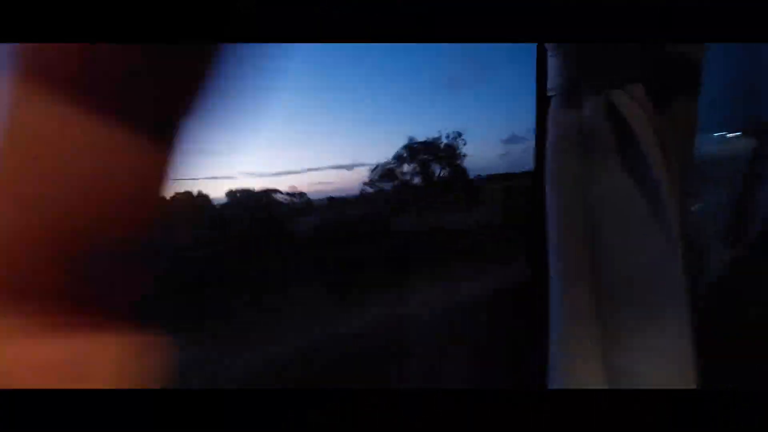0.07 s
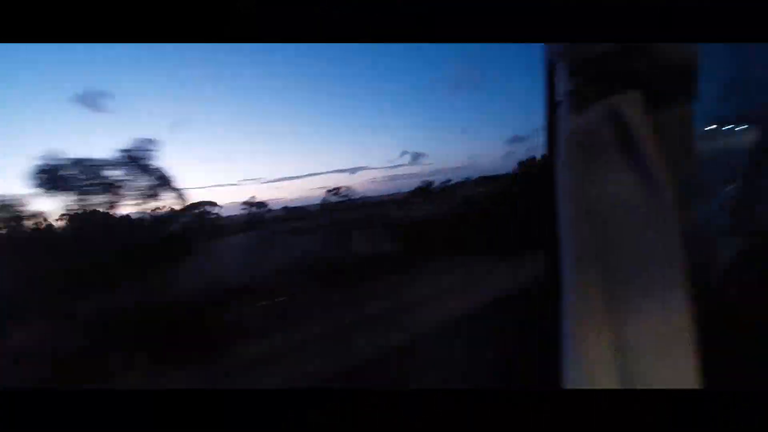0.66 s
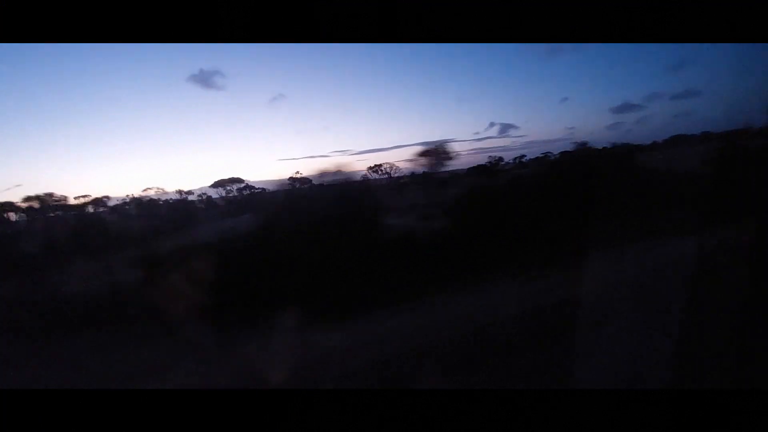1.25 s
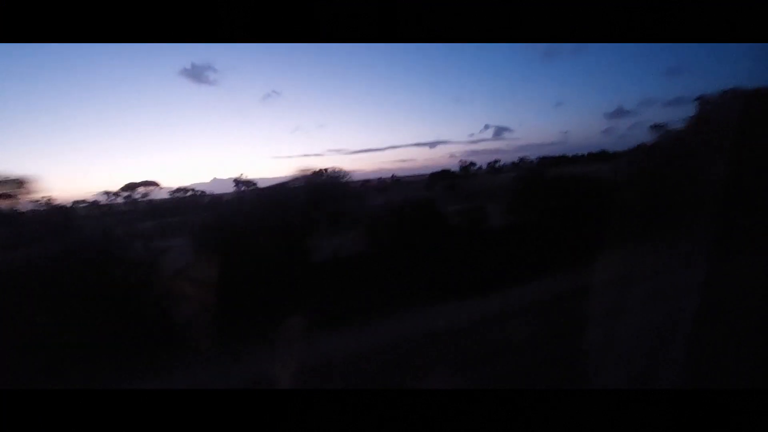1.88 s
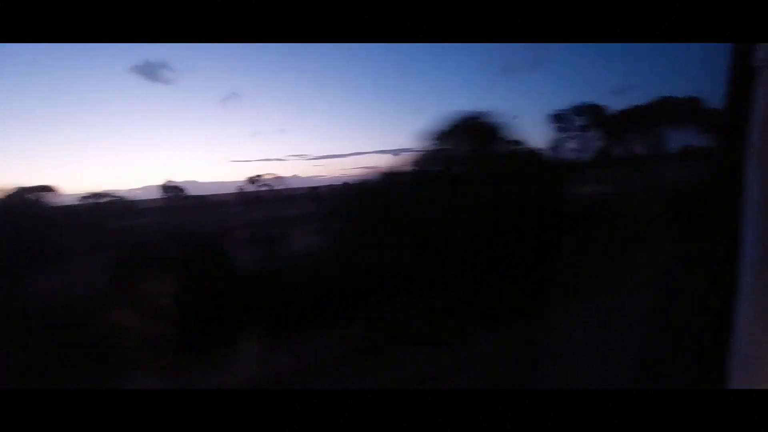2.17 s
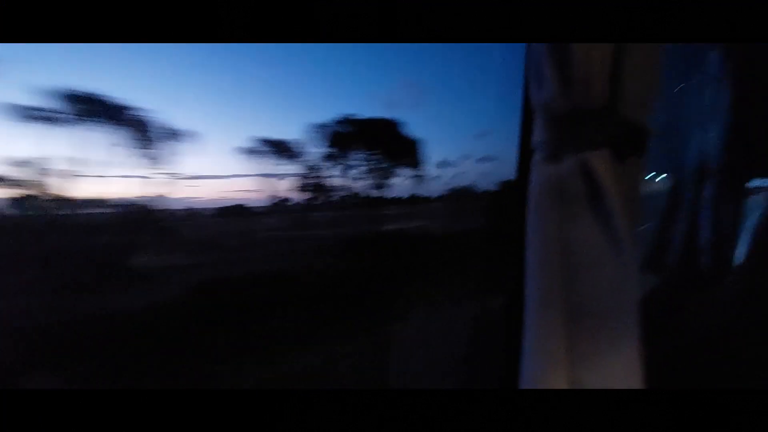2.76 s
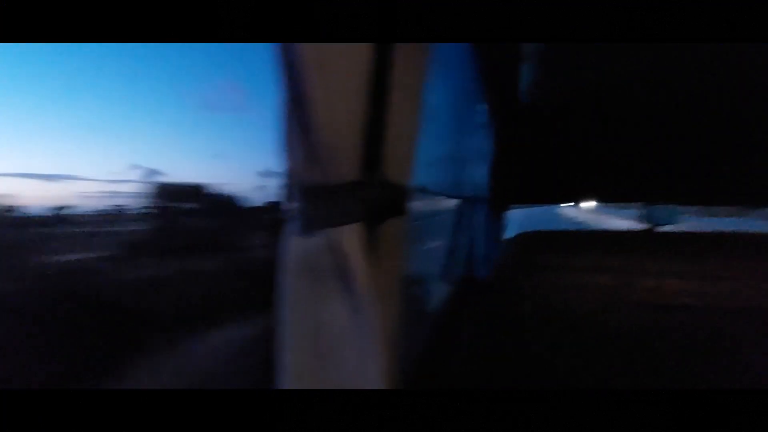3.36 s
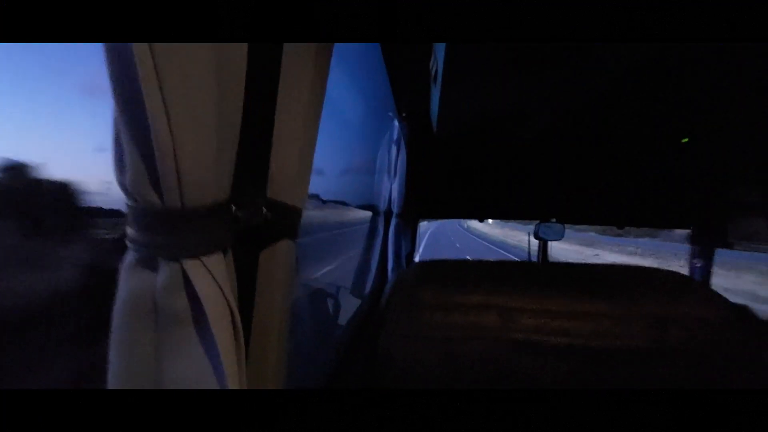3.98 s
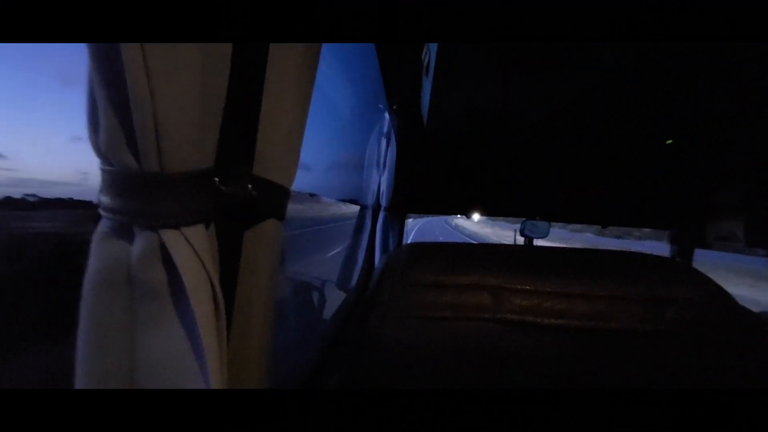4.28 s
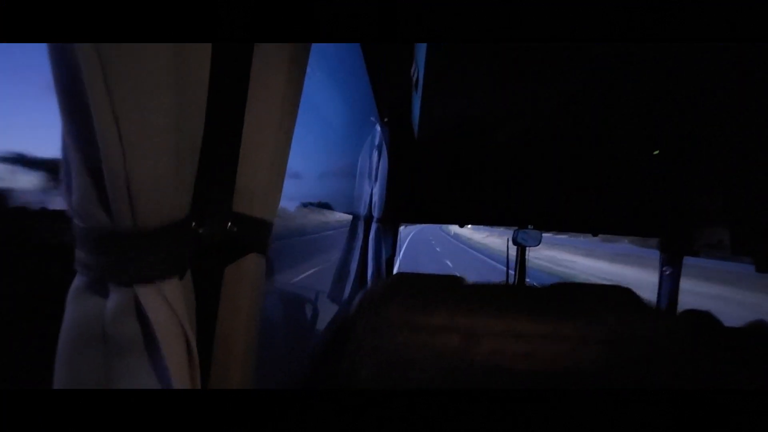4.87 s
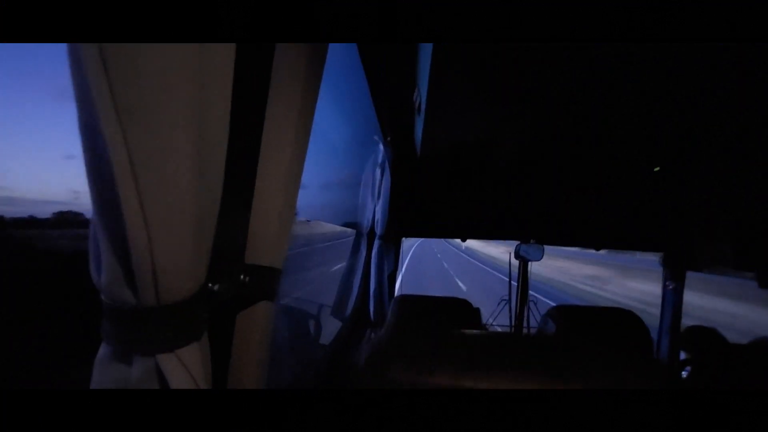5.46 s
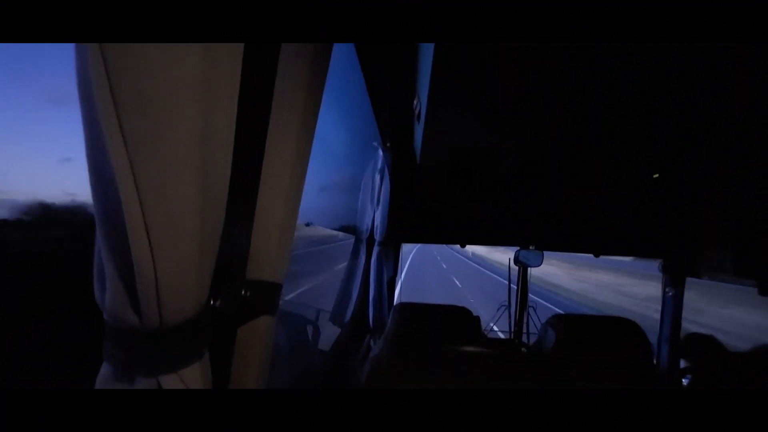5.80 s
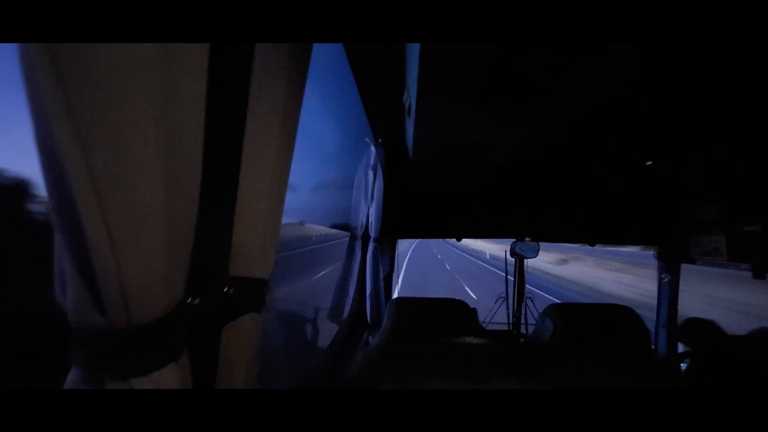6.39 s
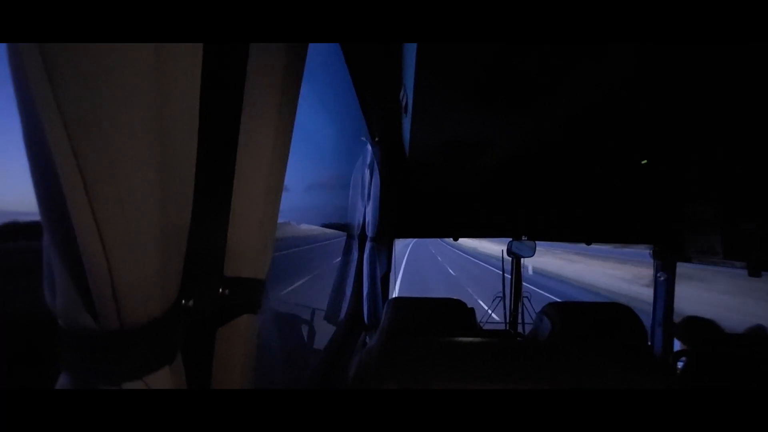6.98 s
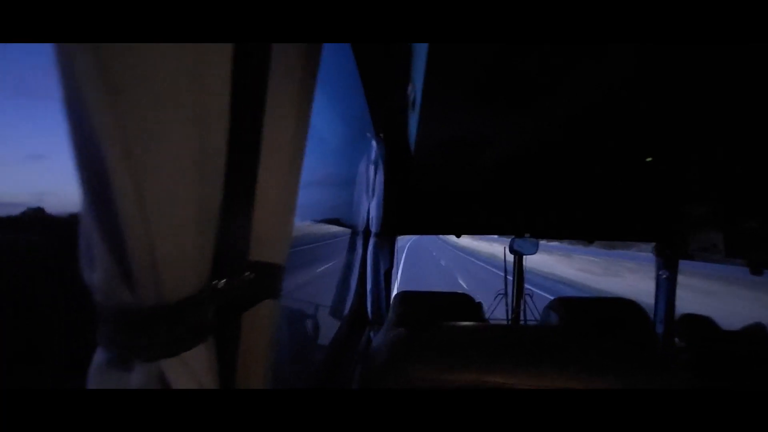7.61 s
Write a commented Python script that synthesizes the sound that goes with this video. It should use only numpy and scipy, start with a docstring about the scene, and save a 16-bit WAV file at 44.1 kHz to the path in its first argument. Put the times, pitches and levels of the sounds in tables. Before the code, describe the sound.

Inside a cruising coach, a deep road rumble and a steady diesel drone run throughout, with tyres and air rushing. At the start a fingertip knocks the hand-held microphone, and fingers scuff and tick on the right. Bumps jolt the body and knock a loose panel dully. A dry tap comes about halfway, trim squeaks faintly, and the tyre roar swells near the end.

```python
"""Inside a cruising coach, heard on a hand-held phone. All along, the road makes the body boom, a
six-cylinder diesel drones, and tyres and air rush. First a fingertip knocks the left microphone and fingers
scuff and tick by the right one. By 1 s the phone faces the side window and the right side has lost bass.
Bumps jolt the body and knock a loose panel. Around 3 s the phone turns back to the aisle and the body starts
to heave. A tap on the case follows at 4 s, trim squeaks after 5 s, and the tyres roar loudest near 7 s."""
import sys
import numpy as np
from scipy import signal
from scipy.fft import rfft, irfft
from scipy.io import wavfile

SR = 44100
rng = np.random.default_rng(int(sys.argv[2]) if len(sys.argv) > 2 else 0)


def file_out(sig):
    """Save sig as 16-bit WAV at sys.argv[1]."""
    # one column per channel
    cols = np.atleast_2d(sig).T
    # limit, then scale
    lim = np.clip(cols, -1, 1)
    pcm = np.round(lim * 32767).astype(np.int16)
    wavfile.write(sys.argv[1], SR, pcm)


N = 341334
TIME = np.arange(N) / SR
FREQ = np.arange(N // 2 + 1) * SR / N

# where the phone points: time_s, turn_share (0 = down the aisle, 1 = at the side window)
WINDOW_TURN = [(.5, 0), (1.0, 1), (2.65, 0.92), (3.6, 0.03)]


def body_boom(split_hz=200, boom_db=-2.0, sway_db=-0.93, drum_db=-8.5, window_db=2.5, flicker_db=-0.1):
    """The wheels shake the body into a deep boom and drum on the floor panels."""
    # how strong the boom is from low to high: pitch_hz, level_db_per_hz
    boom_shape = [(20, -74.5), (32, -67), (45, -51.5), (66, -43), (100, -47.5), (130, -41), (160, -48),
                  (185, -50.5), (260, -52.5), (370, -54), (520, -63), (800, -90.5), (2000, -115)]
    noise = cabin_noise() * undb(spectrum(boom_shape))
    noise *= FREQ ** 4 / (FREQ ** 4 + 10 ** 4)  # fades out below 10 Hz
    low_share = 1 / (1 + (FREQ / split_hz) ** 6)
    body = irfft(noise * low_share, N) * undb(boom_db + shaking() + sway_db * drift(5.7))
    floor = irfft(noise * (1 - low_share), N)
    floor *= undb(drum_db + window_db * curve(WINDOW_TURN) + flicker_db * drift(28))
    return body + floor


def engine(crank_hz=25.4, wander=0.001001, drone_db=-2.0, load_share=0.64):
    """The diesel and the parts it drives hum together, all following one slightly wandering speed."""
    # engine tones, on half steps because a four-stroke repeats every second turn:
    # crank_multiple, level_db, window_gain_db, right_gain_db
    engine_tones = [(1, -49.5, -1, 2.5), (1.5, -38, 2, 7), (2, -39.5, 7, -5.5), (3, -29.5, -0.5, 2.5),
                    (3.5, -35, 2, 1), (5, -42.5, 2.5, 5.5), (9, -47.5, 9.5, 3), (13, -45.5, -2.5, 2),
                    (14, -53.5, 10, -2), (22, -71, 9.5, -4), (23, -56, -9.5, 3.5)]
    # hums of the drive line and other engine-driven parts: pitch_hz, level_db
    drive_hums = [(58.2, -28), (212.3, -41.5)]
    # the cabin's hum at twice the rate the cylinders fire: time_s, level_db
    cabin_hum_levels = [(.05, -31.5), (.3, -24.5), (.85, -36), (1.8, -35), (2.1, -28.5), (2.6, -36),
                        (2.85, -29), (3.5, -30.5), (4.2, -28.5), (4.55, -26), (4.78, -28), (4.97, -24),
                        (5.18, -32), (5.42, -25), (5.63, -40), (5.85, -30), (6.45, -28.5), (6.75, -32.5),
                        (7.25, -29), (7.62, -25.5), (7.74, -29)]
    angle = wandering_angle(wander, 1.7)
    turn = curve(WINDOW_TURN)
    drone = sum(tone(multiple * crank_hz * angle, db + window_db * turn) * undb([[0], [right_db]])
                for multiple, db, window_db, right_db in engine_tones)
    drone += sum(tone(hz * angle, db) for hz, db in drive_hums)
    cabin_hum = tone(6 * crank_hz * angle, curve(cabin_hum_levels), waver_db=.7, slip_rad=.2)
    return drone * undb(drone_db + load_share * shaking()) + cabin_hum


def air_and_tyres(air_db=-1.9, flutter_db=0.7, split_hz=850,
                  roar_share=0.47, hiss_share=0.33, load_share=0.14):
    """Air hisses along the body and the tyres roar, more so on coarse asphalt and as the body heaves."""
    # the rush of air from low to high: pitch_hz, left_db_per_hz, right_db_per_hz
    air_shape = [(251, -79.5, -80.5), (560, -73, -69), (775, -71.5, -69.5), (1020, -79.5, -72),
                 (1620, -85.5, -78.5), (2410, -97, -79.5), (3140, -103, -88), (3660, -108, -87.5),
                 (4390, -110, -86), (5430, -116, -99.5), (6900, -120, -99), (8450, -126, -116),
                 (11800, -128, -115), (15500, -130, -125)]
    # how coarse the road is: time_s, gain_db
    road_surface = [(.4, -0.5), (1.25, -7), (2.2, -2.5), (2.85, 2), (3.3, -0.5), (3.9, 2.5), (5.45, 2.5),
                    (6.1, 1.5), (6.5, 4), (6.85, 8), (7.3, 2.5), (7.7, 1)]
    # echoes from window, seat back and roof: delay_s, gain
    reflections = [(.0031, .14), (.0074, .14), (.0127, .15)]
    # such short echoes boost some pitches and weaken others
    echo_filter = 1 + sum(gain * np.exp(-2j * np.pi * FREQ * delay) for delay, gain in reflections)
    air = cabin_noise() * echo_filter * undb([spectrum(air_shape, 1), spectrum(air_shape, 2)])
    coarse_db = curve(road_surface)
    low_share = 1 / (1 + (FREQ / split_hz) ** 6)
    roar = irfft(air * low_share, N) * undb(roar_share * coarse_db)
    hiss = irfft(air * (1 - low_share), N) * undb(hiss_share * coarse_db)
    rush = (roar + hiss) * undb(air_db) + tyre_ring(echo_filter) * undb(coarse_db)
    return rush * undb(load_share * heave() + flutter_db * drift(9.3))


def tyre_ring(echo_filter, gain_db=-3.0, left_db=-7, swell_db=1.13):
    """The rolling tread makes the tyres ring in a few bands; each swells and fades on its own."""
    # where the tyres ring: pitch_hz, width_hz, level_db_per_hz
    tyre_bands = [(440, 53, -64.5), (657, 170, -66.5), (878, 31, -67.5), (2130, 460, -81.5)]
    tread = cabin_noise() * echo_filter * undb([[left_db], [0]])
    out = np.zeros((2, N))
    for hz, width, db in tyre_bands:
        band = irfft(tread / (1 + ((FREQ - hz) / width) ** 2) ** 2, N)
        out += band * undb(gain_db + db + swell_db * drift(5.9))
    return out


def heave():
    """Extra load on the springs, in dB of loudness, as the body rides long waves in the road."""
    # waves in the road: peak_s, half_length_s, gain_db
    road_waves = [(3.147, 0.4, 4), (4.062, 0.4, 1.5), (4.817, 0.27, 3.5), (5.996, 0.25, 2.5),
                  (6.76, 0.31, 2.5), (7.507, 0.45, 3)]
    return sum(db * swell(peak, half_length) for peak, half_length, db in road_waves)


def shaking(window_db=-1.5):
    """How much shaking reaches the phone, in dB: more in a heave, less when it faces the window."""
    return heave() + window_db * curve(WINDOW_TURN)


def jolts(lean_db_per_octave=4.0, centred_hz=480):
    """Each bump sets the panels shuddering; low shudders come from the left, high ones from the right."""
    # bumps in the road: start_s, level_db, pitch_hz, width_octaves, decay_s
    bumps = [(1.006, -27, 161, 1.07, 0.012), (1.6, -34, 75.2, 2.2, 0.045), (2.47, -36, 278, 0.75, 0.069),
             (2.876, -46.5, 1100, 1.2, 0.12), (2.92, -33.5, 538, .2, .04), (2.925, -29.5, 238, 1.05, 0.22),
             (3.314, -27, 64.5, 2, 0.025), (6.15, -31, 62, 0.74, 0.11), (6.72, -29, 67.4, 0.82, .1)]
    out = np.zeros((2, N))
    age = TIME[:SR // 2]
    for start, db, hz, octaves, decay in bumps:
        low, high = hz * 2 ** (-octaves / 2), hz * 2 ** (octaves / 2)
        shake = rng.standard_normal(len(age)) * np.exp(-age / decay)
        shake *= np.sqrt(SR / 2 / (high - low))  # keeps narrow bands as strong as wide ones
        shudder = signal.sosfilt(signal.butter(3, [low, high], "band", fs=SR, output="sos"), shake)
        lean_db = lean_db_per_octave * np.log2(centred_hz / hz)
        at = int(start * SR)
        out[:, at:at + len(age)] += undb([[db + lean_db], [db - lean_db]]) * shudder
    return out


def loose_panel(right_db=-3, contact_s=0.0022):
    """A loose trim panel knocks dully over the sharper bumps and rings for a moment."""
    # its knocks: start_s, level_db
    knocks = [(.964, -30), (2.912, -33.5), (2.934, -33.5)]
    # its hollow ring: pitch_hz, level_db, decay_s
    panel_tones = [(138.3, 13.5, 0.025), (350, -4.5, 0.01), (528, -0.5, 0.017), (592, -6.5, 0.012),
                   (990, -11, 0.013), (1130, -6.5, 0.0067)]
    out = np.zeros(N)
    ring = struck(panel_tones, TIME[:SR // 4], contact_s)
    for start, db in knocks:
        at = int(start * SR)
        out[at:at + len(ring)] += undb(db) * ring
    return np.array([out, out * undb(right_db)])


def fingertip_knock(right_db=-20, snap_db=-12, snap_s=0.0013, snap_top_hz=1700):
    """A fingertip pops the left microphone: a soft snap of contact, then a dead thud."""
    # the two parts of the thud: start_s, level_db, pitch_hz, decay_s
    thuds = [(.009, 1.5, 400, .0012), (.0133, -13, 65, .005)]
    touch_s = thuds[0][0]
    snap = undb(snap_db) * rng.standard_normal(N) * np.exp(-np.abs(TIME - touch_s) / snap_s)
    knock = signal.sosfilt(signal.butter(1, snap_top_hz, fs=SR, output="sos"), snap)
    for start, db, hz, decay in thuds:
        age = np.maximum(TIME - start, 0)
        knock -= undb(db) * np.sin(2 * np.pi * hz * age) * np.exp(-age / decay)
    return np.array([knock, knock * undb(right_db)])


def case_ticks(gain_db=2, crackle_gain=0.15, crackle_s=0.00055, rustle_db=-33, rustle_s=0.013):
    """The phone case ticks under the grip: a sharp click, a tiny crackle, then a faint rustle."""
    # the ticks (light ones sound thin): start_s, level_db, low_edge_hz
    ticks = [(.046, -36, 4000), (.071, -42, 5000), (.296, -40, 6930), (.306, -41, 7000), (.339, -34, 9000),
             (.401, -22, 8000), (.423, -25, 1500), (.604, -34, 4000), (2.4425, -32, 2400),
             (2.444, -33, 2600), (2.5025, -25, 2500), (2.512, -35, 2300), (2.534, -43, 2500),
             (2.551, -41, 9000), (2.65, -43, 9000), (2.714, -42, 7000), (2.737, -37, 7070),
             (2.795, -34.5, 2200), (2.801, -34, 2200), (2.832, -38, 8950), (2.897, -37, 2000),
             (2.906, -39, 4500), (2.921, -44, 9500), (3.012, -45, 6500), (3.198, -43, 6900),
             (3.568, -41, 3000), (3.646, -40, 4000), (5.011, -39, 5970)]
    # their tone colour: pitch_hz, gain_db
    tick_shape = [(300, 11.5), (1500, 31.5), (2400, 19.5), (3400, 15), (4400, 12.5), (5300, 7), (6800, 5.5),
                  (8600, -3.5), (10000, -3), (12000, 5.5), (14000, -1.5), (15500, -2)]
    out = np.zeros(N)
    for start, db, edge_hz in ticks + case_creaks():
        at = int(start * SR)
        age = TIME[:min(SR // 16, N - at)]
        fade = crackle_gain * np.exp(-age / crackle_s) + undb(rustle_db) * np.exp(-age / rustle_s)
        tick = rng.standard_normal(len(age)) * fade
        tick[0] = 1  # the click itself
        tick = signal.sosfilt(signal.butter(2, edge_hz, "high", fs=SR, output="sos"), tick)
        out[at:at + len(tick)] += undb(db + gain_db) * tick
    return on_right(colour(out, tick_shape), left_db=-31.0)


def case_creaks(per_s=1.5, level_db=-45, scatter_db=3, low_edge_hz=7000):
    """A list of extra faint ticks at random moments, likelier the harder the grip slides."""
    chance = rng.random((int(per_s * N / SR), 2))
    slid = np.cumsum(sliding_grip())
    starts = np.interp(chance[:, 0], slid / slid[-1], TIME)
    return [(start, level_db - scatter_db * weak, low_edge_hz) for start, weak in zip(starts, chance[:, 1])]


def finger_rubs(scuff_db=3, grip_db=-2, squeak_wander=0.025):
    """Fingers scuff and rub the case; now and then the skin catches and squeaks."""
    # quick finger slips: start_s, length_s, level_db
    slips = [(0.041, 0.011, -55), (0.199, 0.089, -66), (0.3, 0.059, -53), (0.375, 0.048, -54),
             (0.505, 0.028, -62), (0.563, 0.048, -57.5), (0.628, 0.047, -57), (0.813, 0.043, -60.5),
             (1.635, 0.031, -61.5), (1.828, 0.03, -63), (1.908, 0.022, -63.5), (3.566, 0.037, -57.5),
             (6.014, 0.027, -59.5), (6.164, 0.04, -62.5), (6.279, 0.036, -61), (7.63, 0.089, -63.5)]
    # tone colour of those scuffs: pitch_hz, gain_db
    scuff_shape = [(200, -4.5), (700, 26), (2000, 14.5), (4300, 13.5), (5400, 6.5), (6700, 12), (7700, 2.5),
                   (8800, -5), (12000, -1), (15500, -23)]
    # tone colour of the slow rubbing: pitch_hz, gain_db
    rub_shape = [(1000, -4), (4300, 13.5), (6800, 6), (8800, -3), (10500, -1), (12200, 3), (14000, -9.5),
                 (15500, -8.5)]
    # squeaks of skin: start_s, level_db, pitch_hz, length_s
    skin_squeaks = [(0.225, -54, 11000, 0.019), (0.312, -46, 7600, .008), (0.38, -43, 7400, 0.013),
                    (0.639, -44, 1940, 0.033), (0.817, -45.5, 1910, 0.022), (3.566, -46, 6700, 0.0089)]
    pressure = sum(undb(db + scuff_db) * stroke(start, length) for start, length, db in slips)
    scuffs = colour(pressure * skin_friction(), scuff_shape)
    rubbing = colour(undb(grip_db) * sliding_grip() * skin_friction(), rub_shape)
    angle = wandering_angle(squeak_wander, 460)
    squeaks = sum(undb(db) * stroke(start, length) * np.sin(hz * angle)
                  for start, db, hz, length in skin_squeaks)
    return on_right(scuffs + rubbing + squeaks, left_db=-32.0)


def sliding_grip():
    """How strongly the hand rubs as it slides slowly over the case."""
    # the slides: peak_s, half_length_s, level_db
    slides = [(0.04, 0.089, -57), (.3, .12, -62), (0.633, .17, -59.5), (2.093, 0.22, -65),
              (2.604, 0.15, -67.5), (3.52, 0.085, -65.5), (4.182, 0.21, -60), (4.622, .15, -69),
              (6.066, 0.25, -63), (7.433, 0.27, -64), (7.716, 0.089, -63.5)]
    return sum(undb(db) * swell(peak, half_length) for peak, half_length, db in slides)


def skin_friction(grain_db=4):
    """Skin moves over plastic in a mass of tiny slips of uneven size."""
    slips = rng.standard_normal(N) * undb(grain_db * drift(780))
    return slips / slips.std()


def palm_rumble():
    """The palm presses as it shifts its hold, which rumbles through the phone."""
    # the presses: peak_s, half_length_s, level_db
    presses = [(0.323, 0.035, -14), (0.465, 0.063, -26), (0.59, 0.079, -23), (0.718, 0.048, -28.5)]
    # their dull tone colour: pitch_hz, gain_db
    rumble_shape = [(20, -17.5), (50, -3), (125, 6), (170, -2.5), (300, -15.5), (600, -33), (1500, -41),
                    (3000, -50.5), (5000, -70)]
    rumble = colour(rng.standard_normal(N), rumble_shape)
    force = sum(undb(db) * swell(peak, half_length) for peak, half_length, db in presses)
    return on_right(force * rumble / rumble.std(), left_db=-8)


def case_tap(start_s=4.087, gain_db=-17.5, contact_s=.0003):
    """One dry, woody tap on the case next to the right microphone."""
    # the short ring of the case: pitch_hz, level_db, decay_s
    case_tones = [(1000, -2, .001), (1380, 1.5, 0.00065), (2000, -12, 0.00064)]
    age = np.maximum(TIME - start_s, 0)
    return on_right(undb(gain_db) * struck(case_tones, age, contact_s), left_db=-24)


def gear_whine(flutter_db=2.5, flutter_hz=9, left_db=-4):
    """Gears and axle whine in thin tones that flutter and sink into the road noise."""
    # the whines, with the phone facing either way: pitch_hz, aisle_db, window_db
    whines = [(432, -49.5, -48.5), (483, -58, -46.5), (662, -55.5, -57.5), (751, -58, -66), (873, -64, -63)]
    turn = curve(WINDOW_TURN)
    out = np.zeros((2, N))
    for hz, aisle_db, window_db in whines:
        db = aisle_db + turn * (window_db - aisle_db) + flutter_db * drift(flutter_hz)
        out += tone(2 * np.pi * hz * TIME, db, waver_db=1.0, slip_rad=0.76)
    return out * undb([[left_db], [0]])


def tread_song(wander=0.0069):
    """The tyre tread sings for a moment on some patches of road, at an unsteady pitch."""
    # the sung notes: peak_s, half_length_s, level_db, pitch_hz
    notes = [(2.2, .17, -53, 874), (3.76, .08, -44, 718), (4.3, .1, -52, 872), (5.8, .25, -48.5, 662),
             (6.8, .25, -52, 912), (6.95, .3, -46, 664)]
    return on_right(swelling_tones(notes, wandering_angle(wander, 20)), left_db=-6)


def trim_squeaks(wander=.05, rough_db=3):
    """Plastic trim rubs as the body twists, giving a thin, hoarse squeak whose pitch never settles."""
    # the squeaks: peak_s, half_length_s, level_db, pitch_hz
    chafes = [(2.043, 0.056, -53, 3900), (5.133, 0.077, -55, 4180), (5.48, .1, -58, 4130)]
    squeaks = swelling_tones(chafes, wandering_angle(wander, 400))
    return on_right(squeaks * undb(rough_db * drift(120)), left_db=-18)


def cabin_noise():
    """Spectra of white noise at the two microphones: alike in the bass, nearly unrelated higher up."""
    # how alike the two sides are: pitch_hz, correlation (1 = the same)
    likeness = [(60, 1), (180, 0.75), (350, 0.62), (800, 0.2), (1500, -0.18), (2400, -0.17)]
    alike = spectrum(likeness)
    shared, opposed = rfft(rng.standard_normal((2, N)))
    shared *= np.sqrt((1 + alike) / 2)
    opposed *= np.sqrt((1 - alike) / 2)
    return np.array([shared + opposed, shared - opposed]) * np.sqrt(SR / 2)


def tone(phase, db, waver_db=2.5, slip_rad=0.9, right_shift_rad=0.1):
    """One stereo tone; it wavers as the phone moves through the cabin's loud and quiet spots."""
    phase = phase + slip_rad * drift(3.63) + rng.uniform(0, 2 * np.pi)
    gain = np.sqrt(2) * undb(db + waver_db * drift(2.6))
    return gain * np.array([np.sin(phase), np.sin(phase + right_shift_rad)])


def struck(tones, age, contact_s):
    """The fading ring of something hit; a longer contact softens its start."""
    ring = sum(undb(db) * np.sin(2 * np.pi * hz * age) * np.exp(-age / decay) for hz, db, decay in tones)
    return ring * (1 - np.exp(-age / contact_s))


def swelling_tones(notes, angle):
    """Tones that each fade in and out, sharing one wobble in pitch."""
    return sum(undb(db) * swell(peak, half_length) * np.sin(hz * angle) for peak, half_length, db, hz in notes)


def stroke(start_s, length_s):
    """Pressure of one finger slip: quick to rise, then let go."""
    progress = np.maximum(TIME - start_s, 0) / length_s
    return 1.2 * (1 - np.exp(-progress / 0.062)) * np.exp(-progress ** 2)


def swell(peak_s, half_length_s):
    """A smooth rise and fall in time, 1 at the peak."""
    return np.exp(-((TIME - peak_s) / half_length_s) ** 2)


def drift(rate_hz):
    """A smooth random wobble with a typical size of 1."""
    wobble = irfft(rfft(rng.standard_normal(N)) * np.exp(-(FREQ / rate_hz) ** 2), N)
    return wobble / wobble.std()


def wandering_angle(wander, rate_hz):
    """Phase of a 1 Hz tone whose speed strays by the share `wander`; multiply it by a pitch."""
    return 2 * np.pi * np.cumsum(1 + wander * drift(rate_hz)) / SR


def colour(sound, shape):
    """Filter a sound by a (pitch_hz, gain_db) table."""
    cepstrum = irfft(np.log(undb(spectrum(shape))), N)
    # folding it this way makes the filter ring only after a sound, never before
    cepstrum[1:N // 2] *= 2
    cepstrum[N // 2 + 1:] = 0
    return irfft(rfft(sound) * np.exp(rfft(cepstrum)), N)


def on_right(sound, left_db):
    """Place a sound on the right, fainter in the left."""
    return np.array([sound * undb(left_db), sound])


def curve(table):
    """The value of a time table at every sample."""
    rows = np.array(table)
    return np.interp(TIME, rows[:, 0], rows[:, 1])


def spectrum(table, column=1):
    """One column of a pitch table at every frequency."""
    rows = np.array(table)
    return np.interp(np.log(FREQ + 1), np.log(rows[:, 0]), rows[:, column])


def undb(db):
    """Decibels to gain."""
    return 10 ** (np.asarray(db) / 20)


def scene():
    """The coach's cabin plus the hand on the phone."""
    cabin = body_boom() + air_and_tyres() + engine() + gear_whine() + tread_song()
    rattles = jolts() + loose_panel() + trim_squeaks()
    hand = fingertip_knock() + case_tap() + palm_rumble() + finger_rubs() + case_ticks()
    return cabin + rattles + hand


def record(dry, thin_from_s=.878, fade_s=0.004, dip_db=-14.0, dip_s=.045, top_hz=15800):
    """The right side starts full in the bass, then dips briefly and stays thin; the top treble is cut."""
    # the right side's tone colour at first: pitch_hz, gain_db
    full_shape = [(40, 2.5), (150, 0.5), (230, 4.5), (330, -0.5), (800, -1.5)]
    # the same once its bass has thinned: pitch_hz, gain_db
    thin_shape = [(40, -12.5), (160, -12.5), (230, -7), (330, -1), (520, 0)]
    left, right = dry
    full, thin = (irfft(rfft(right) * undb(spectrum(shape)), N) for shape in (full_shape, thin_shape))
    full_share = np.clip((thin_from_s - TIME) / fade_s, 0, 1)
    dip = undb(dip_db * swell(thin_from_s, dip_s))
    right = full_share * full + (1 - full_share) * dip * thin
    return signal.sosfilt(signal.ellip(8, .2, 70, top_hz, fs=SR, output="sos"), np.array([left, right]))


dry = scene()
out = record(dry)
file_out(out)
```